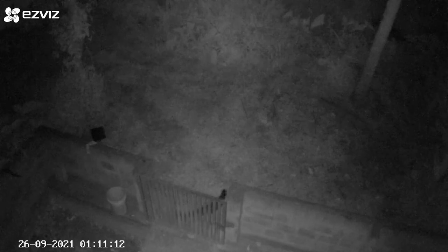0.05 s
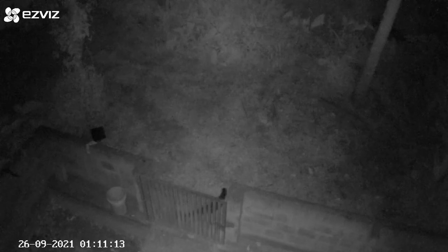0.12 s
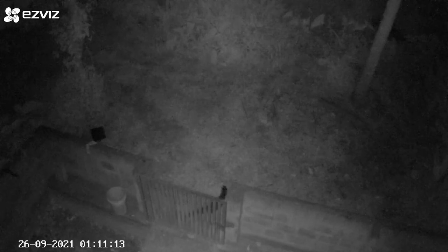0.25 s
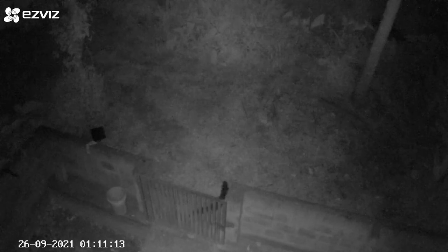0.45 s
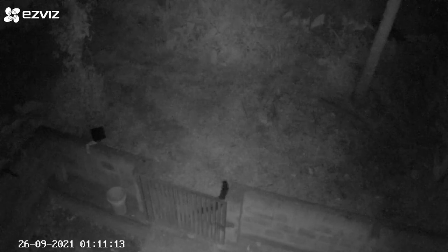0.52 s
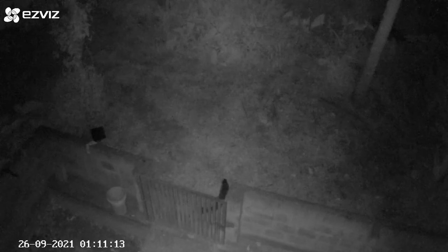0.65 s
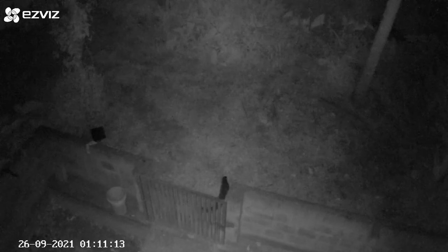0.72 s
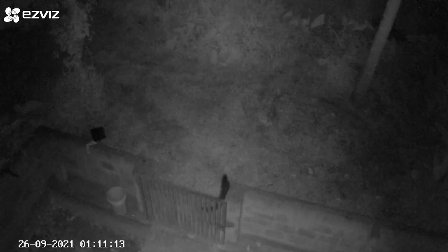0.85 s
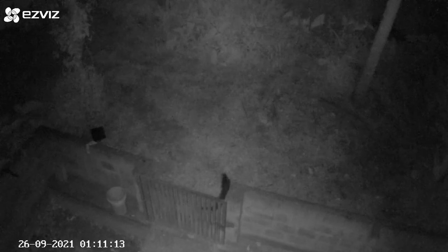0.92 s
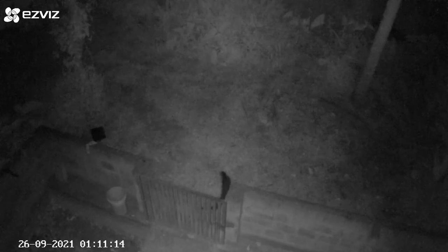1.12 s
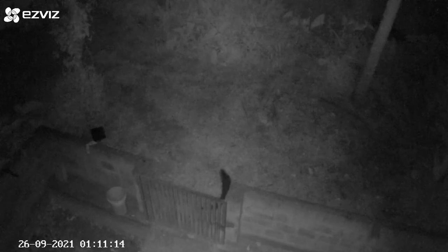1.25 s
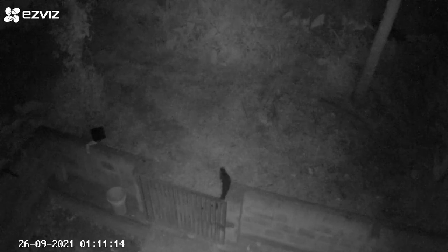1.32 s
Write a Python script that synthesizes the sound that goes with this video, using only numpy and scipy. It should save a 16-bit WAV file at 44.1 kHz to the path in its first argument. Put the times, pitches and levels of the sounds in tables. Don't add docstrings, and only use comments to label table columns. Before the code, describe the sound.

A small frog clicks loudly in a night yard. From 0 to 0.1 s a neighbour's thinner clicks fade out. At 0.2 s the near frog fires a quickening train around 3.3 kHz, then sharper cracks from 0.39 to 0.5 s, with short outdoor echo. After 0.87 s the background dips in patches; faint rounded far notes come near 1.07 and 1.3 s. Insects hiss, distant callers warble, wind softly thumps the dull microphone.

```python
import sys
import numpy as np
from scipy import signal
from scipy.fft import rfft, irfft, next_fast_len
from scipy.io import wavfile
from scipy.ndimage import uniform_filter1d, map_coordinates

SR = 44100
rng = np.random.default_rng(int(sys.argv[2]) if len(sys.argv) > 2 else 0)


def transcribe(u):
    v = np.clip(np.atleast_2d(u).T, -1, 1)
    q = np.round(v * 32767).astype(np.int16)
    wavfile.write(sys.argv[1], SR, q)


def volts_from_db(level):
    exponent = np.asarray(level, float) / 20
    return 10 ** exponent


N = 61739
T = np.arange(N) / SR

# (time [s], peak level [dB], pitch [Hz], hold [ms])
QUICKENING_CLICKS = [(0.2043, -10, 3324, 5.2), (0.2187, -6, 3255, 2.8), (0.2332, -6, 3321, 3.5),
                     (0.2441, -6.5, 3292, 4.1), (0.2524, -7.5, 3279, 3.2), (0.2597, -12, 3380, 3.4),
                     (0.2645, -13, 3185, 1.5), (0.2671, -18.5, 3450, 2.5), (0.2712, -19.5, 3283, 3.5),
                     (0.2815, -25.5, 3250, 3.1), (0.2865, -24.5, 3262, 7), (0.302, -26.5, 3335, 3.5),
                     (0.3101, -33.5, 3304, 4), (0.3224, -28.5, 3450, 2.9), (0.3407, -27, 3110, 3.5),
                     (0.349, -30, 3320, 4.8), (0.3551, -24, 3374, 4.6), (0.3639, -21.5, 3420, 4.3),
                     (0.3727, -20, 3360, 2)]
# (time [s], peak level [dB], pitch [Hz], hold [ms])
SHARP_CLICKS = [
    (.3891, -14.5, 3450, .6),
    (.4208, -14.5, 3450, .9),
    (.4441, -9.5, 3506, 0.51),
    (.4585, -12, 3477, 0.81),
    (.4671, -17, 3558, 1.5),
    (.4772, -15, 3730, .6),
]
# (peak time [s], level [dB], pitch [Hz], half length [ms])
SWELLS = [(.3925, -24, 3484, 1.8), (.399, -20.5, 3433, 2.6), (.4255, -28, 3490, 4.6), (.431, -19, 3380, 3),
          (.449, -19.5, 3404, 2.9), (.4538, -15, 3550, 2), (.4565, -18.5, 3622, 1.6),
          (.4617, -17, 3630, 1.2), (.4647, -16, 3660, 1.6), (.4708, -17, 3499, 1.1),
          (.4738, -24.5, 3756, 1.8), (.481, -18.5, 3707, 1.8), (.489, -32, 3620, 3),
          (.4955, -30, 3610, 1.5), (.4995, -28.5, 3574, 1.5), (.5125, -31.5, 3426, 4.6)]


def near_frog():
    sharp = clicks(QUICKENING_CLICKS + SHARP_CLICKS, crack_db=-0.5, low_hz=2116, high_hz=4040)
    swells = filtered(notes(SWELLS), lambda hz: 1 / (1 + ((hz - 3450) / 1000) ** 8))
    return sharp + swells


# (time [s], peak level [dB], pitch [Hz])
NEIGHBOUR_CLICKS = [(0.0048, -19, 3497), (0.0192, -21.5, 3430), (0.0298, -22, 3470), (0.0345, -24.5, 3460),
                    (0.0385, -22.5, 3536), (0.0475, -28, 3490), (0.051, -24, 3526), (0.0584, -29, 3620),
                    (0.0654, -28.5, 3480), (0.0754, -31, 3610), (0.0874, -35.5, 3544), (0.0964, -38, 3510),
                    (0.1114, -40.5, 3550)]


def neighbour_frog():
    hold_ms = 2.5
    rows = [(*row, hold_ms) for row in NEIGHBOUR_CLICKS]
    return clicks(rows, crack_db=-11, low_hz=3250, high_hz=4330)


def clicks(rows, crack_db, low_hz, high_hz):
    sag_db_per_ms, sac_t60_s, rise_s = 1.1, 0.0084, 0.00027
    crack_t60_s, crack_pitch_ratio = 0.0063, 0.83
    bounce_s, bounce_db = 0.006, -14.5
    out = np.zeros(N + SR)
    t = T[:SR // 20]
    variations = rng.standard_normal((len(rows), 2))
    for (start_s, db, hz, hold_ms), (crack_var, bounce_var) in zip(rows, variations):
        ring_db = -sag_db_per_ms * 1000 * t - 60 * np.maximum(t - hold_ms / 1000, 0) / sac_t60_s
        ring = volts_from_db(ring_db) * np.sin(2 * np.pi * hz * t)
        crack_level_db = crack_db + 0.69 * crack_var - 60 * t / crack_t60_s
        crack = volts_from_db(crack_level_db) * np.sin(2 * np.pi * crack_pitch_ratio * hz * t)
        click = volts_from_db(db - 2.5) * (ring + crack) * (1 - np.exp(-t / rise_s)) ** 2
        out[round(start_s * SR):][:len(t)] += click
        echo_s = start_s + bounce_s + 0.0003 * bounce_var
        out[round(echo_s * SR):][:len(t)] += volts_from_db(bounce_db) * click
    return filtered(out[:N], lambda hz: 1 / (1 + (low_hz / (hz + 1)) ** 16) / (1 + (hz / high_hz) ** 16))


def notes(rows):
    out = np.zeros(N)
    for peak_s, db, hz, half_ms in rows:
        swell = np.cos(np.pi / 2 * np.clip((T - peak_s) / (half_ms / 1000), -1, 1))
        out += volts_from_db(db) * swell * np.sin(2 * np.pi * hz * T)
    return out


def yard(x, t60_s):
    t, hop = T[:SR // 2], SR // 10
    out = np.zeros(N + 2 * SR)
    for k in range(-hop, N, hop):
        tail = rng.standard_normal(len(t)) * volts_from_db(-60 * t / t60_s) * (1 - np.exp(-(t / 0.0057) ** 2))
        n = np.arange(max(k, 0), min(k + 2 * hop, N))
        moment = x[n] * np.sin(np.pi * (n - k) / (2 * hop))
        wet = signal.fftconvolve(moment, tail / np.linalg.norm(tail))
        out[n[0]:n[0] + len(wet)] += wet
    return out[:N]


# (peak time [s], level [dB], pitch [Hz], half length [ms])
FAR_NOTES = [(1.062, -50, 3250, 6), (1.069, -45.5, 3148, 2.7), (1.077, -42, 3072, 6),
             (1.091, -46.5, 3072, 10.7), (1.101, -46, 3094, 4.2), (1.112, -45.5, 3080, 7.5),
             (1.256, -46.5, 3314, 6), (1.269, -42.5, 3334, 6.4), (1.278, -40.5, 3335, 7),
             (1.287, -44, 3400, 3), (1.296, -44.5, 3330, 3.1), (1.302, -45.5, 3470, 1.3),
             (1.311, -54, 3250, 4.4), (1.322, -46.5, 3256, 4.2), (1.335, -53, 3277, 4.6),
             (1.358, -53, 3395, 6.8), (1.369, -45, 3390, 4.2), (1.383, -44, 3390, 5),
             (1.395, -44, 3336, 4.4)]


def far_frog():
    out = notes(FAR_NOTES)
    return out + volts_from_db(-8) * yard(out, t60_s=0.18)


# (start [s], length [s], level [dB], pitch [Hz], click rate [1/s])
FAR_TRAINS = [(.0, 0.035, -52.5, 4570, 90), (0.227, 0.073, -54, 4550, 90), (0.485, 0.074, -56.5, 4434, 90),
              (0.71, 0.055, -75, 3920, 220), (0.77, 0.086, -59.5, 4340, 80), (0.66, 0.069, -63.5, 4650, 70),
              (0.806, 0.097, -59, 3486, 70), (0.82, 0.032, -75, 3500, 41), (1.061, 0.04, -62.5, 3150, 62),
              (1.048, 0.037, -76, 1850, 48), (1.4, 0.051, -57.5, 3230, 87), (1.236, 0.03, -58.5, 2950, 98),
              (1.245, 0.019, -70, 4640, 18), (1.345, 0.085, -60.5, 3354, 110),
              (1.348, 0.043, -62, 4136, 70), (1.363, 0.027, -61.5, 2755, 53),
              (1.291, 0.11, -67.5, 4585, 56), (0.271, 0.057, -73, 770, 77), (0.481, 0.036, -66.5, 313, 61),
              (.0, 0.052, -66.5, 2720, 50), (.18, 0.1, -60, 6250, 56), (1.015, 0.034, -60, 3070, 42),
              (1.19, 0.071, -59, 3310, 83), (1.085, 0.035, -70, 264, 30), (.0, .05, -51.5, 3950, 110),
              (1.1, 0.047, -66, 240, 41)]


def far_callers():
    width_ratio, spread_hz, edge_s = 0.03, 44, 0.022
    out = np.zeros(N)
    for start_s, length_s, db, pitch_hz, rate_hz in FAR_TRAINS:
        beat = 1 + 0.66 * np.cos(2 * np.pi * (rate_hz * T + 0.29 * wobble(25)))
        width_hz = width_ratio * pitch_hz + spread_hz
        blurred = filtered(beat ** 2 * rng.standard_normal(N),
                           lambda hz: 1 / (1 + ((hz - pitch_hz) / width_hz) ** 4))
        edge = np.clip(np.minimum(T - start_s, start_s + length_s - T) / edge_s + 0.5, 0, 1)
        out += volts_from_db(db) * np.sin(np.pi / 2 * edge) ** 2 * unit(blurred)
    return out + volts_from_db(-3.5) * yard(out, t60_s=0.22)


# (frequency [Hz], density [dB per Hz])
HIGH_INSECTS = [(3090, -58), (5250, -28.5), (5400, -13.5), (5730, -2.5), (6030, 4), (6340, -4),
                (6800, -14.5), (7640, -25), (9930, -54), (16800, -120)]
# (frequency [Hz], density [dB per Hz])
LOW_INSECTS = [(4150, -19.5), (4400, -5), (4650, 1.5), (4850, -14), (5050, -35)]
# (frequency [Hz], density [dB per Hz])
NIGHT_AIR = [(100, -7), (300, -7), (500, -13.5), (1200, -21), (2800, -25), (4800, -20.5), (5300, -41),
             (8800, -46)]


def chorus():
    high_db = -57 + 0.4 * wobble(12.0) + 0.23 * wobble(70)
    low_db = -68 + 1.1 * wobble(6.5) + 1.6 * wobble(60)
    air_db = -69 + 0.19 * wobble(13)
    high = volts_from_db(high_db) * rush(HIGH_INSECTS, patchy_db=4.0)
    low = volts_from_db(low_db) * rush(LOW_INSECTS, patchy_db=2.5)
    return high + low + volts_from_db(air_db) * rush(NIGHT_AIR, patchy_db=4.5)


def sharpened(x):
    z = signal.stft(x, nperseg=4096, noverlap=3072)[2]
    level = uniform_filter1d(np.abs(z), size=15, axis=0) + 1e-12
    lines = z * (np.abs(z) / level) ** 0.74
    return signal.istft(lines, nperseg=4096, noverlap=3072)[1][:N]


# (peak time [s], level [dB], rise [s], fall [s])
PUSHES = [(0.046, -44, 0.045, 0.068), (0.08, -38.5, 0.016, 0.011), (0.149, -50, 0.031, 0.044),
          (0.208, -34.5, 0.031, 0.02), (0.311, -46.5, 0.076, 0.077), (0.377, -40, 0.029, 0.034),
          (.51, -39, 0.064, 0.082), (.635, -45, 0.065, 0.035), (0.721, -39.5, 0.059, 0.018),
          (0.742, -38, 0.017, 0.014), (0.778, -47, 0.04, 0.063), (0.817, -43, 0.0124, 0.017),
          (.85, -50.5, 0.018, 0.025), (0.95, -35.5, 0.033, 0.02), (1.098, -43.5, 0.035, 0.029),
          (1.296, -42, 0.039, 0.051), (1.39, -43.5, 0.022, 0.015)]
# (frequency [Hz], density [dB per Hz])
FLUTTER = [(30, -3), (105, 5.5), (200, -18), (400, -37.5)]


def wind():
    flutter_db, flutter_rest_db = -21, -70.5
    push = np.zeros(N)
    for peak_s, db, rise_s, fall_s in PUSHES:
        lean = np.where(T < peak_s, (peak_s - T) / rise_s, (T - peak_s) / fall_s)
        push += volts_from_db(db) * np.cos(np.pi / 2 * np.clip(lean, 0, 1)) ** 2
    return push + (volts_from_db(flutter_db) * push + volts_from_db(flutter_rest_db)) * rush(FLUTTER, patchy_db=-2.0)


def rush(points, patchy_db):
    z = signal.stft(rng.standard_normal(N + 512), nperseg=512)[2]
    field = uniform_filter1d(uniform_filter1d(rng.standard_normal(z.shape), 3, 0), 8, 1)
    x = signal.istft(z * volts_from_db(patchy_db * unit(field)), nperseg=512)[1][:N]
    f, db = np.transpose(points)
    return unit(filtered(x, lambda hz: volts_from_db(np.interp(np.log(hz + 1), np.log(f + 1), db, -120, -120))))


def wobble(rate_hz):
    return map_coordinates(rng.standard_normal(int(N * rate_hz / SR) + 4), [T * rate_hz])


def filtered(x, response):
    m = next_fast_len(N + 8192)
    return irfft(rfft(x, m) * response(np.fft.rfftfreq(m, 1 / SR)), m)[:N]


def unit(x):
    return x / np.sqrt(np.mean(x ** 2) + 1e-20)


def scene():
    near = near_frog() + neighbour_frog()
    near_wet = near + volts_from_db(-7.5) * yard(near, t60_s=0.34)
    background = sharpened(far_callers() + chorus())
    return (near_wet + far_frog() + background + wind())[None]


def smeared(x):
    frame, lead, smear_bins = 2822, 1367, 25
    smear_db, cap_db = -6, -8
    z = signal.stft(np.pad(x, (lead, 0)), window='cosine', nperseg=2 * frame)[2]
    level = uniform_filter1d(np.abs(z), size=smear_bins, axis=0)
    capped = np.minimum(level, volts_from_db(cap_db) * level.max(axis=0))
    error = capped * np.exp(2j * np.pi * rng.random(z.shape))
    noise = signal.istft(error, window='cosine', nperseg=2 * frame)[1][lead:][:N]
    return x + volts_from_db(smear_db) * noise


# (start [s], end [s], gain [dB])
DUCKS = [
    (0.869, .93, -14.5),
    (0.989, 1.061, -15),
    (1.12, 1.249, -15.5),
]


def ducking():
    edge_s = 0.028
    duck_db = np.zeros(N)
    for start_s, end_s, db in DUCKS:
        duck_db += db * np.clip(np.minimum(T - start_s, end_s - T) / edge_s + 0.5, 0, 1)
    return volts_from_db(duck_db)


def band_limit(hz):
    edge = 1 / (1 + np.exp(np.clip((hz - 7800) / 200, -50, 50)))
    return edge + volts_from_db(-13.5) / (1 + (hz / 9300) ** 40)


def roll_off(x):
    return signal.sosfilt(signal.butter(12, 9100, fs=SR, output="sos"), x)


def record(dry):
    bass = filtered(dry[0], lambda hz: 1 / (1 + (hz / 130) ** 4))
    ducked = ducking() * smeared(dry[0] - bass)
    hiss = volts_from_db(-83) * rush([(150, -4.0), (1000, -6.5), (8000, -15.5)], patchy_db=0.4)
    mix = filtered(bass + ducked + hiss, band_limit)[None] + 0.00043
    return roll_off(mix)


dry = scene()
out = record(dry)
transcribe(out)
```